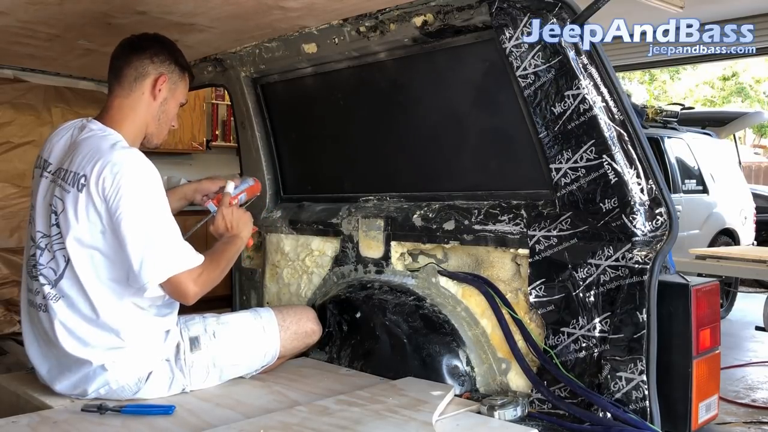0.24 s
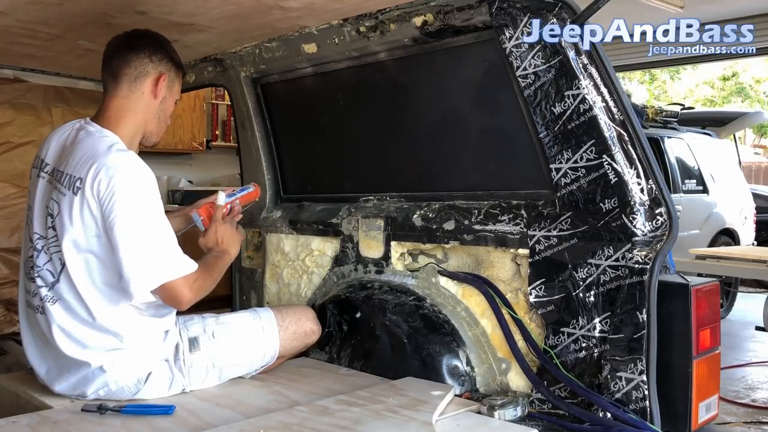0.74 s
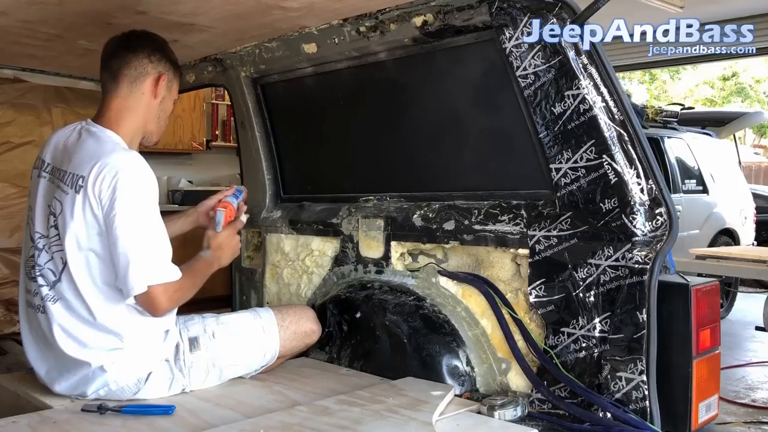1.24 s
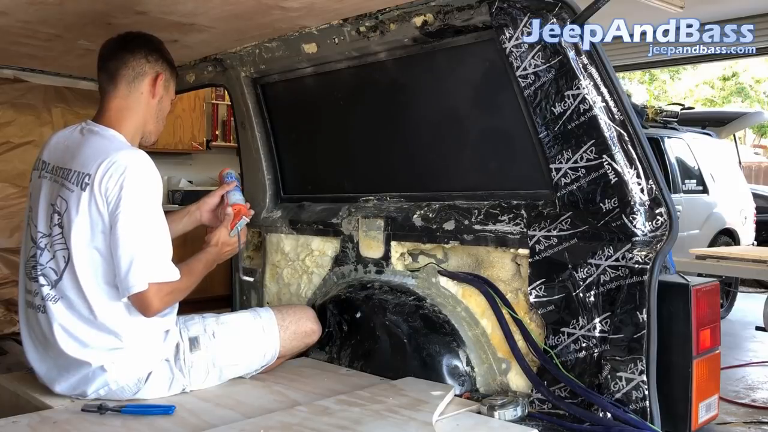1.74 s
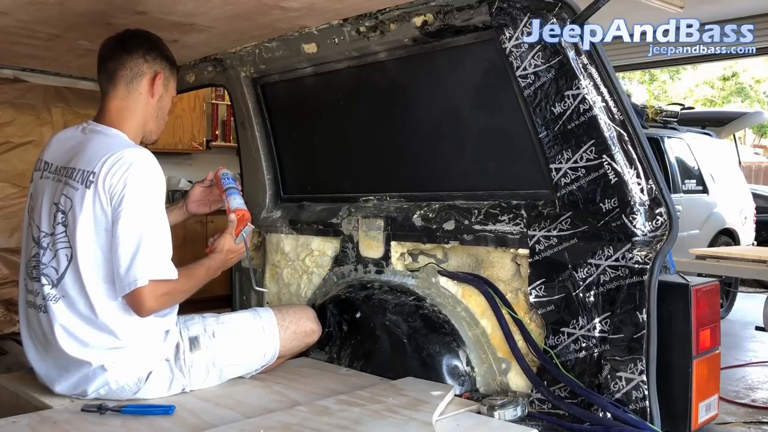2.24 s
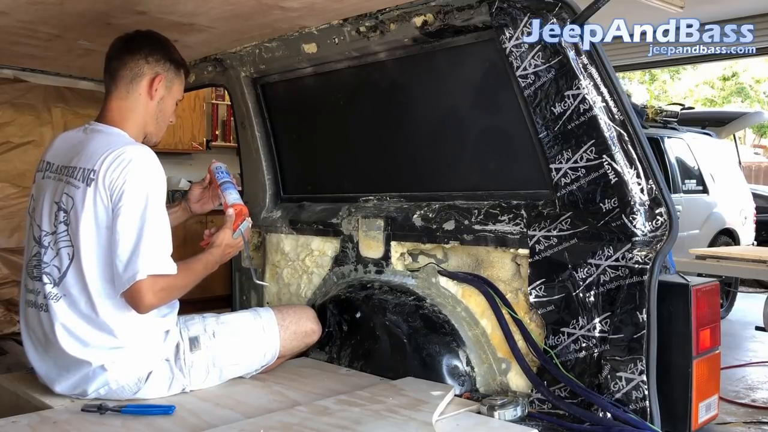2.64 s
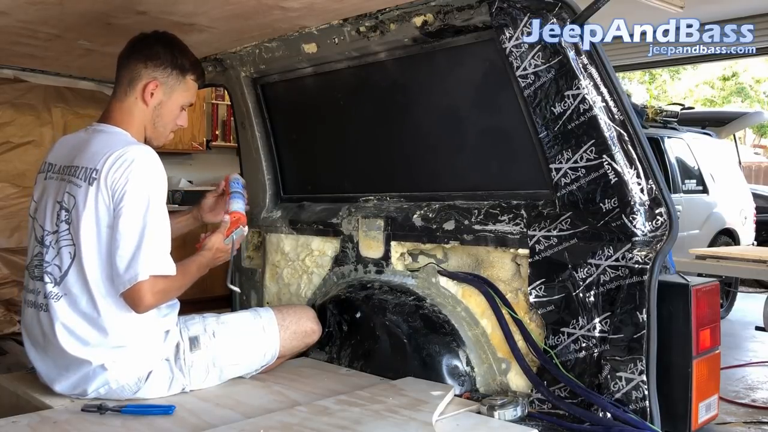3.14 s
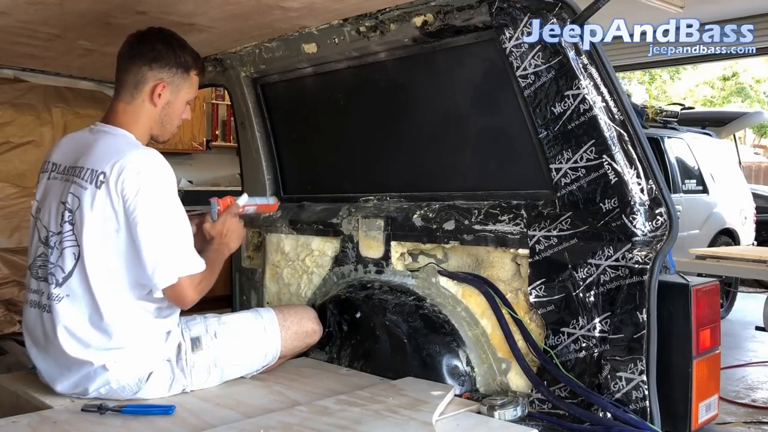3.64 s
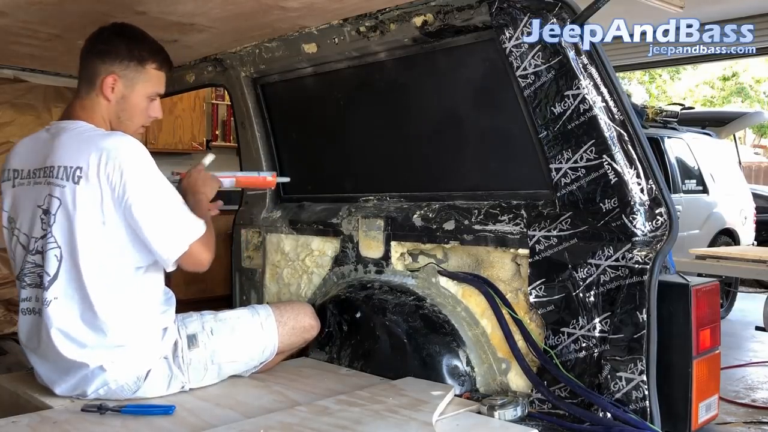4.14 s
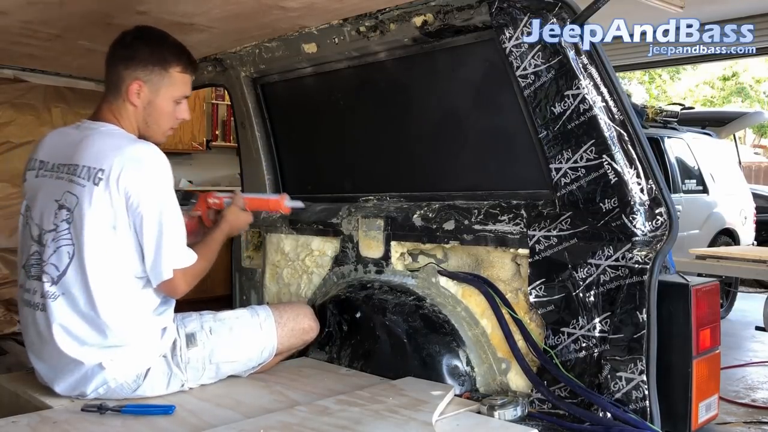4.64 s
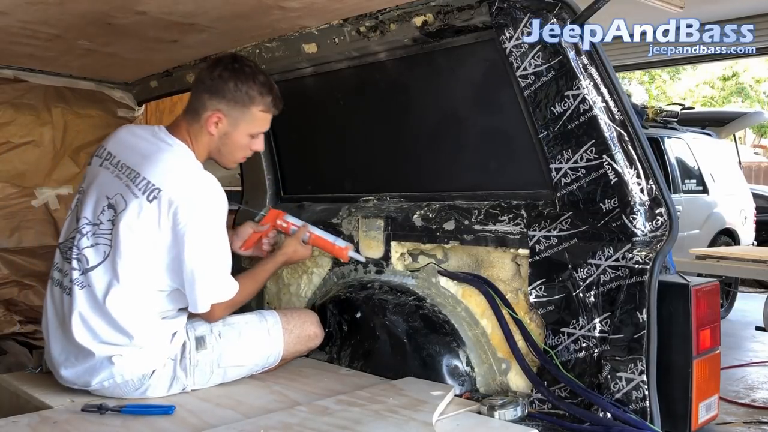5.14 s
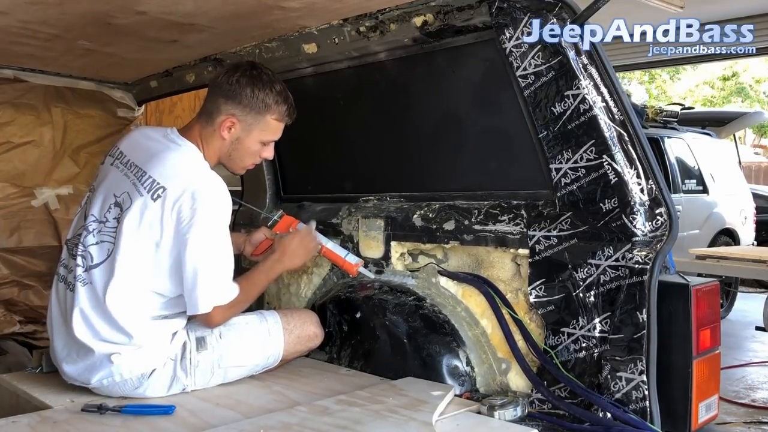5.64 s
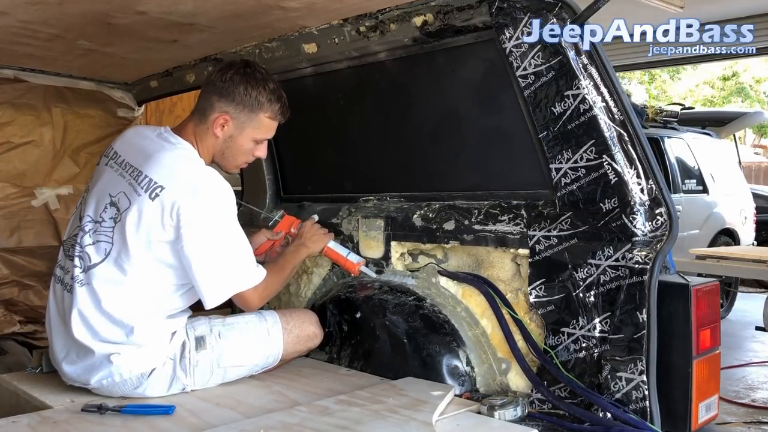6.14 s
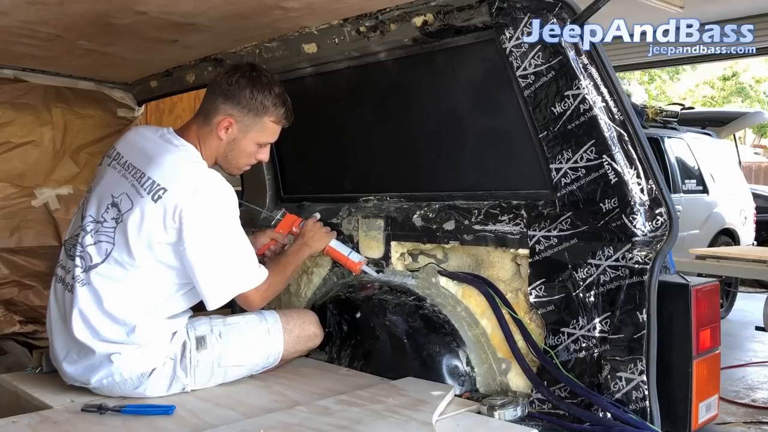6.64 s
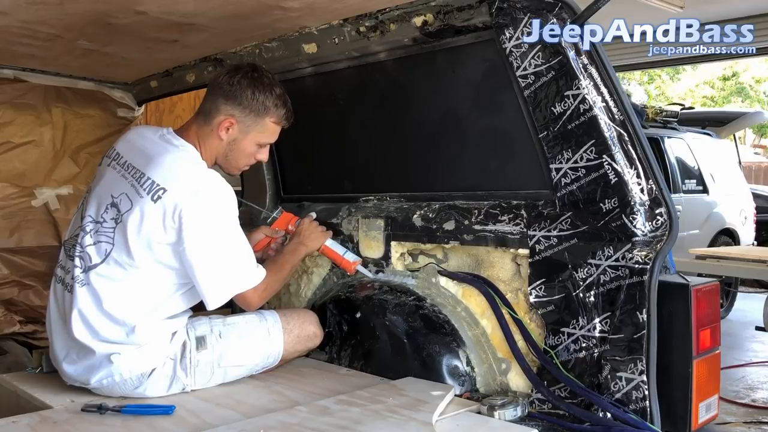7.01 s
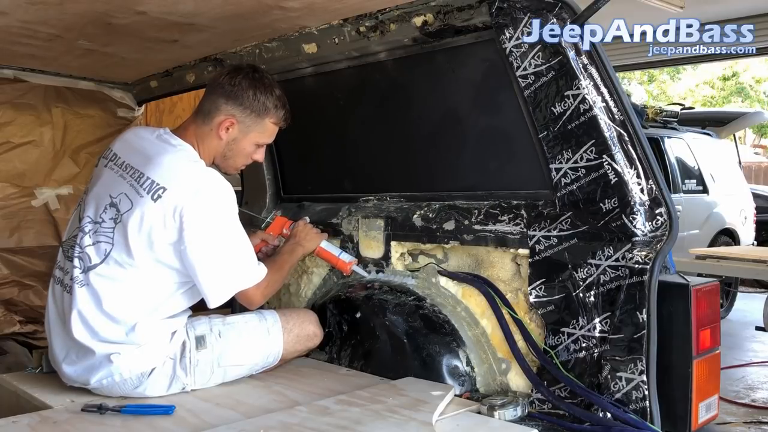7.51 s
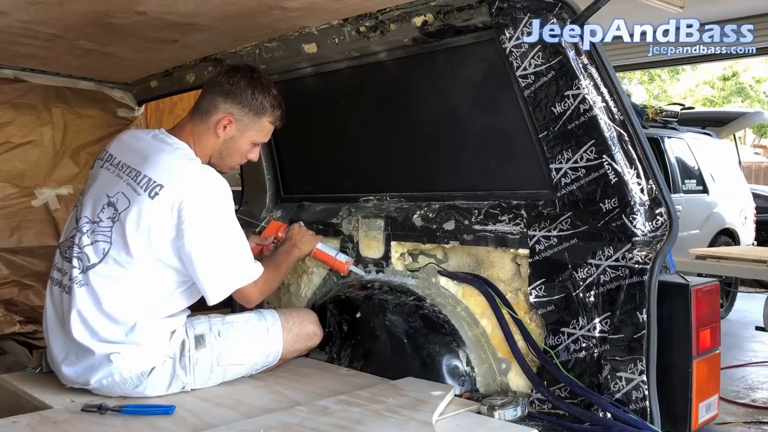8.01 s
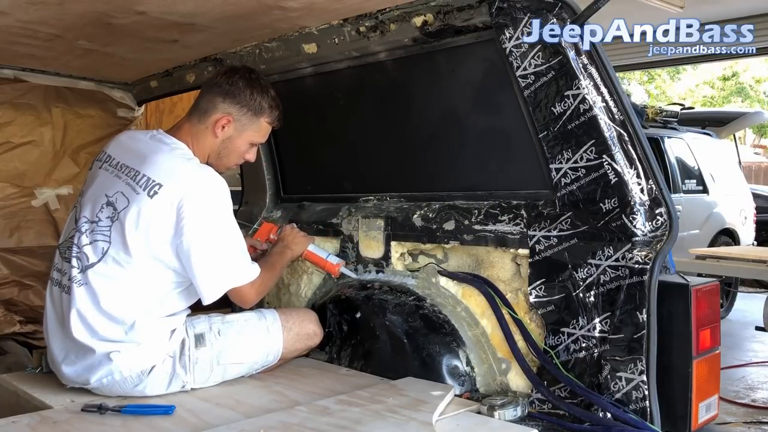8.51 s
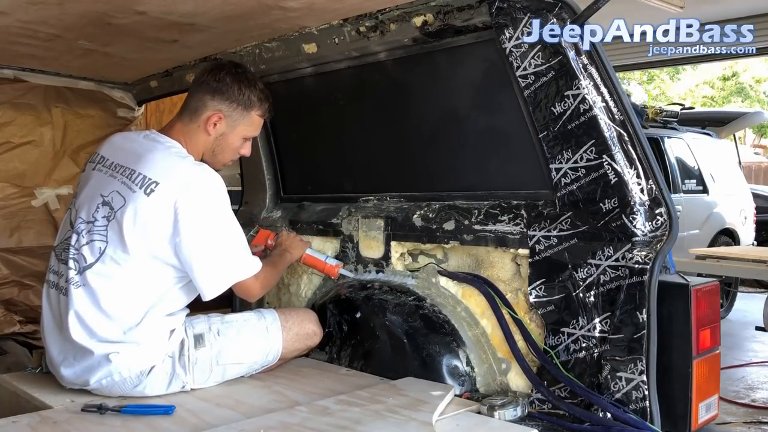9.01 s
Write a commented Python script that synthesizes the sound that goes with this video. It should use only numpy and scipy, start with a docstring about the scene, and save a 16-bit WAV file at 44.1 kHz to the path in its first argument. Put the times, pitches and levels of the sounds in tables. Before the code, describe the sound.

A caulking gun clacks loudly, its steel rod squeaks and scrapes sharply, then small ratcheting ticks continue over a low throbbing motor hum.

```python
"""A hand caulking gun is worked inside the stripped back of a parked vehicle, a metre or two from the microphone.
Its steel rod squeaks (wavering tones) and scrapes (filtered random contacts) through the catch plate, the trigger
clacks against the frame (a noise snap over damped modes), and the loaded rod ticks forward while sealant is laid.
A motor hums in beating sine lines under a faint high hiss and two thin whines; the cabin adds a short echo."""
import sys
import numpy as np
from scipy import signal
from scipy.fft import rfft, irfft, next_fast_len
from scipy.io import wavfile
from scipy.ndimage import uniform_filter1d, minimum_filter1d

SR = 44100
rng = np.random.default_rng(int(sys.argv[2]) if len(sys.argv) > 2 else 0)


def persist_wave(psi):
    """Save psi, clipped to +-1, as 16-bit WAV."""
    counts = np.round(np.clip(psi, -1, 1) * 32767).astype(np.int16)
    wavfile.write(sys.argv[1], SR, np.atleast_2d(counts).T)


N = 408807

# The rod squeals in the plate. Each row: start in seconds, length in seconds, pitch in Hz, level in dB,
# overtones in dB against the fundamental, roughness from 0 to 1.
SQUEALS = [(1.004, .015, 3380, -13.5, -5, .5), (1.018, 0.023, 3380, -12.5, -22, 0.8),
           (1.037, .022, 3030, -20.5, -12, 0), (1.286, 0.0077, 3120, -2.5, -15.5, 0.06),
           (1.295, .0055, 3280, -2.5, -27, 0.3), (1.302, .007, 3360, -7, -23, 0.7),
           (1.3056, .0125, 3154, 0, -14, 0.33), (1.573, .013, 3315, -8, -7, 0.76),
           (1.8012, .0125, 2900, -6.5, -3, 0.1), (1.839, 0.011, 8340, -23, -40, 0.06),
           (4.865, .014, 3140, -18, -18, 0.05)]
# Modes of the gun's frame. Each row: frequency in Hz, level in dB, t60 in seconds.
FRAME_MODES = [(1150, -14.5, 0.071), (1613, -13.5, 0.11), (1827, -6, 0.047), (2052, -2, 0.045),
               (2326, -2, 0.031), (2560, -9, 0.044), (3180, -6, 0.061), (3750, -10, 0.028),
               (4500, -6, 0.068)]
# Spectrum of steel on steel. Each row: frequency in Hz, level in dB.
STEEL_SPECTRUM = [(300, -36), (750, -25), (1150, -7.5), (1700, 1), (4200, 2), (6000, -1), (9000, -2),
                  (12000, -5.5), (15500, -29)]
SLIDE_TILT_DB = -2  # brightness of bare steel sliding, dB per octave


def undb(db):
    """Decibels to gain."""
    return 10 ** (np.asarray(db) / 20)


def unit(x):
    """Scale to rms 1."""
    return x / np.sqrt(np.mean(x ** 2) + 1e-18)


def clock(length):
    """Sample times of a sound of this length in seconds."""
    return np.arange(int(length * SR)) / SR


def onset(t, rise_s):
    """Exponential approach to full force with this time constant."""
    return 1 - np.exp(-t / rise_s)


def fade(t, t60):
    """Exponential decay, 60 dB down after t60 seconds."""
    return np.exp(-np.log(1000) * t / t60)


def add(track, s, x):
    """Mix x into the track at s seconds."""
    i = int(s * SR)
    track[i:i + len(x)] += x[:N - i]


def curve(points, s):
    """Value of a (seconds, value) curve at these times."""
    return np.interp(s, *np.transpose(points))


def colour(x, points, tilt_db=0):
    """Minimum-phase filter through (Hz, dB) points, tilted by dB per octave about the middle of the gun's range."""
    size = 2 * next_fast_len(len(x) // 2 + 1024)
    octave = np.log2(np.maximum(np.fft.rfftfreq(size, 1 / SR), 1))
    hz, db = np.transpose(points)
    db = np.interp(octave, np.log2(hz), db)
    db = db + tilt_db * np.clip(octave - np.log2(3000), -2, 2)
    # folding the cepstrum onto positive times makes the filter causal
    cepstrum = irfft(np.log(undb(db)))
    cepstrum[1:size // 2] *= 2
    cepstrum[size // 2 + 1:] = 0
    response = np.exp(rfft(cepstrum))
    return irfft(rfft(x, size) * response)[:len(x)]


def ring(t, modes, stretch=1, scatter_db=2):
    """Damped modes; each blow weights them a little differently and stretch scales their pitch."""
    out = np.zeros(len(t))
    for hz, db, t60 in modes:
        weight = rng.choice([-1, 1]) * undb(db + scatter_db * rng.standard_normal())
        out += weight * fade(t, t60) * np.sin(2 * np.pi * hz * stretch * t)
    return out


def chatter(t):
    """Dense tiny contacts of equal size and random sign."""
    return rng.choice([-1., 1.], len(t))


def catches(t, depth_db, rate=500):
    """Uneven grip: a level in dB that wanders between random values, rate of them a second, rms 1."""
    knots = np.arange(0, t[-1] + 2 / rate, 1 / rate)
    return unit(undb(depth_db * np.interp(t, knots, rng.standard_normal(len(knots)))))


def damped_tones(rows):
    """Soft pushes that each set a single damped resonance going."""
    out, t = np.zeros(N), clock(.2)
    for s, db, hz, rise_s, t60 in rows:
        add(out, s, undb(db) * onset(t, rise_s) * fade(t, t60) * np.sin(2 * np.pi * hz * t))
    return out


def hum(drift_rad=0.19, looseness=0.47):
    """Close motor lines that throb together once a turn, loosely in step, and wander slightly in phase."""
    mains_hz, turn_hz = 60, 18.34
    # Rms in dB of lines one turning rate apart, the second at twice the mains.
    beat_levels = [-45.5, -44.5, -36, -52, -52.5]
    # Multiples of the turning rate, and the rms of each in dB.
    shaft_orders = (2, 4, 5, 10)
    shaft_levels = [-62, -53.5, -58, -53]
    # Other tones. Each row: frequency in Hz, rms in dB.
    other_tones = [(58.9, -54.5), (528, -61.5)]
    beats = [(2 * mains_hz + (k - 1) * turn_hz, db) for k, db in enumerate(beat_levels)]
    shaft = [(k * turn_hz, db) for k, db in zip(shaft_orders, shaft_levels)]
    t, out = np.arange(N) / SR, np.zeros(N)
    knots = np.arange(0, t[-1] + 1, .5)
    for hz, db in beats + shaft + list(other_tones):
        wander = drift_rad * np.interp(t, knots, rng.standard_normal(len(knots)))
        turns = hz * t + looseness * rng.random()
        out += np.sqrt(2) * undb(db) * np.sin(2 * np.pi * turns + wander)
    return out


def background():
    """A motor's beating hum over steady air noise and two thin whines, which are narrow bands of noise."""
    # Each row: centre in Hz, half-width in Hz where the level is 6 dB down, rms in dB.
    whine_bands = [(2060, 77, -54.5), (8880, 55, -51.5)]
    # Spectrum of the air noise. Each row: frequency in Hz, level in dB.
    air_spectrum = [(25, -26), (45, -12), (62, -0.5), (130, 1.5), (200, 0.5), (350, -3.5), (470, -9.5),
                    (1500, -13.5), (3200, -19), (6300, -16.5), (7400, -11), (8700, -6), (11500, -13),
                    (16000, -18)]
    air_db = -37
    f = np.fft.rfftfreq(N, 1 / SR)
    whine = np.zeros(N)
    for hz, width, db in whine_bands:
        band = rfft(rng.standard_normal(N)) / (1 + ((f - hz) / width) ** 2)
        whine += undb(db) * unit(irfft(band, N))
    mid, side = (undb(air_db) * unit(colour(rng.standard_normal(N), air_spectrum)) for _ in range(2))
    # the two microphone ports hear nearly the same bass and differ more in the treble
    side = colour(side, [(40, -20), (130, -32), (220, -18.5), (500, -13.0),
                         (1500, -16.5), (4000, -16.5), (8700, -18.5), (14000, -8.5)])
    return hum() + whine + mid + side * np.array([[1], [-1]])


def handling(grain_db=4, fits_db=4, fits_per_s=40):
    """The loose rod rubs in its guide and the gun in the hands, in small fits as they are moved."""
    # The rod rubs in its guide between pulls. Each row: time in seconds, level in dB.
    sliding_levels = [(.93, -64), (1.0, -35), (1.15, -41), (1.4, -37.5), (1.9, -40), (2.05, -49),
                      (2.2, -49), (2.4, -70)]
    # Faint rubbing while the gun is turned in the hands. Each row: time in seconds, level in dB.
    grip_levels = [(3.2, -66), (3.8, -53), (4.1, -58), (4.6, -50.5), (5.12, -42), (5.3, -64), (6, -52),
                   (6.2, -64), (8.55, -50), (9.2, -59)]
    grip_tilt_db = -6.5  # brightness per octave
    t, out = np.arange(N) / SR, np.zeros(N)
    for levels, tilt_db in (sliding_levels, SLIDE_TILT_DB), (grip_levels, grip_tilt_db):
        slips = chatter(t) * catches(t, grain_db) * catches(t, fits_db, fits_per_s)
        out += undb(curve(levels, t)) * unit(colour(slips, STEEL_SPECTRUM, tilt_db))
    return out


def scrapes(grain_db=3, uneven_db=4, frame_db=-38, overrun=1.65):
    """Sliding metal, alone and under each squeal: a swell of uneven micro-slips that also stirs the frame."""
    # Rod and tube rub in the frame. Each row: start in seconds, length in seconds, level in dB,
    # brightness in dB per octave.
    rubs = [(0.0706, .008, -23.5, -5.5), (0.309, .028, -25.5, -8.5), (.35, 0.043, -30.5, -5),
            (1.253, 0.09, -29, -2), (1.305, 0.021, -23, 8), (1.452, 0.046, -25, -2),
            (1.526, 0.023, -26, -1.5), (1.547, 0.034, -24, -2.5), (1.7, 0.062, -25, -1.5),
            (1.793, 0.041, -21, -1), (3.614, 0.072, -42.5, -6), (4.812, 0.039, -34, -7.5),
            (5.023, .066, -29, -5), (5.048, .018, -33, 4.5), (6.85, 0.037, -30.5, -2),
            (7.916, .021, -31.5, -1), (9.115, 0.056, -28.5, 0)]
    full_squeal_db, follow = -24.5, 0.58  # scrape under a 0 dB squeal; dB of scrape per dB of squeal
    under_squeals = [(s, overrun * length, full_squeal_db + follow * db, SLIDE_TILT_DB)
                     for s, length, _, db, _, _ in SQUEALS]
    out = np.zeros(N)
    for s, length, db, tilt_db in list(rubs) + under_squeals:
        t = clock(length)
        grains = undb(grain_db * np.minimum(rng.exponential(size=len(t)), 5))
        slips = chatter(t) * grains * catches(t, uneven_db)
        swell = signal.windows.tukey(len(t), .5)
        add(out, s, undb(db) * unit(colour(slips * swell, STEEL_SPECTRUM, tilt_db)))
    stirred_frame = signal.fftconvolve(out, ring(clock(.2), FRAME_MODES))[:N]
    return out + undb(frame_db) * stirred_frame


def clacks(gain_db=-6, snap_t60=0.015, rattle_db=-4, hollow_db=2, ring_db=-11, uneven_db=3, detune=0.0245):
    """A snap and a brief uneven rattle of steel; the frame rings and the tube answers with a hollow knock."""
    # Trigger and catch hit the frame. Each row: start in seconds, level in dB before the common gain,
    # brightness in dB per octave, contact rise in seconds.
    hits = [(.078, 5.5, -3.5, 0.0017), (.316, -6.5, -2, .0034), (.347, -5.5, -5.5, .0008),
            (.363, -7.5, -4, .001), (.383, -5, -3.5, 0.0017), (.981, -5, -4.5, 0.0024),
            (1.179, -5.5, -1.5, .0035), (1.195, -1.5, -1.5, 0.00056), (1.468, -9, 4, .001),
            (1.478, 4, 1.5, 0.00058), (1.589, -4, -2.5, 0.0011), (1.777, -8.5, -5.5, .0006),
            (1.8158, -1.5, -4.5, .001), (4.893, -5, -5.5, 0.00035), (6.8776, -3.5, -2, 0.002),
            (7.9377, 0, -1.3, .0003), (7.949, -6, 2, .0015), (9.1068, 1, 0.8, .0007),
            (9.128, -0.5, 0.2, 0.00066)]
    # The tube knocks hollow until it is seated in the frame. Each row: time in seconds,
    # level in dB relative to the clack, before hollow_db.
    tube_play = [(.08, -11), (.32, 4), (.38, -9), (.6, -36)]
    # Spectrum of the hollow knock. Each row: frequency in Hz, level in dB.
    hollow_spectrum = [(100, -6), (300, 0), (600, -3.5), (850, 6), (1150, 12.5), (1600, 0), (4000, -24)]
    rattle_t60 = 0.047  # seconds
    out, t = np.zeros(N), clock(0.22)
    for s, db, tilt_db, rise_s in hits:
        press = onset(t, rise_s)
        snap = fade(t, snap_t60 + 2 * rise_s)
        rattle = undb(rattle_db) * fade(t, rattle_t60) * catches(t, uneven_db)
        contact = chatter(t) * press * (snap + rattle)
        steel = colour(contact, STEEL_SPECTRUM, tilt_db)
        tube = undb(curve(tube_play, s) + hollow_db) * colour(contact, hollow_spectrum)
        stretch = 1 + detune * rng.standard_normal()  # the modes shift with the grip
        frame = undb(ring_db) * press * ring(t, FRAME_MODES, stretch)
        add(out, s, undb(db + gain_db) * (steel + tube + frame))
    return out


def twangs():
    """Parts of the gun twang, each a single damped tone at its own pitch; the higher, the shorter. The two
    highest rows ring out of the frame at the first clacks."""
    # Each row: start in seconds, level in dB, pitch in Hz.
    twang_rows = [(.079, -4, 3720), (.347, -11.5, 3780), (4.583, -35, 1450), (5.03, -23, 1600),
                  (5.068, -13, 2620), (6.03, -30, 1445), (6.876, -21.5, 1338), (7.922, -19, 1630),
                  (7.944, -14, 1590), (9.112, -23, 1116), (9.128, -11.5, 1625), (9.144, -13, 1616)]
    rise_cycles, ring_cycles = 2.9, 117  # rise time constant and t60, in cycles of the pitch
    return damped_tones([(s, db, hz, rise_cycles / hz, ring_cycles / hz) for s, db, hz in twang_rows])


def ticks(low_db=-8.0, high_db=-8.2, grit_db=-8, detune=0.026):
    """Each gritty slip of the rod knocks the gun; hand and full tube damp it, and the grip shifts its pitch a little."""
    # The rod slips a little. Each row: start in seconds, level in dB before the make-up.
    slip_rows = [(0.7627, -24), (0.856, -25.5), (0.9113, -19.5), (0.929, -26), (3.3044, -28), (3.6155, -20),
                 (3.9794, -22.5), (4.1988, -23), (4.5105, -26.5), (4.58, -21.5), (4.6558, -24),
                 (4.788, -25), (4.8245, -20.5), (5.3955, -14), (5.9736, -26), (6.0232, -19),
                 (6.2406, -14.5), (6.4916, -21.5), (6.576, -12.5), (6.783, -20), (6.8199, -20),
                 (7.1865, -13.5), (7.3508, -18.5), (7.5009, -15), (7.632, -17), (7.8386, -11),
                 (8.2186, -25), (8.318, -21.5), (8.4389, -19.5), (8.7296, -19), (8.861, -18),
                 (9.0268, -14.5)]
    # Resonances of the gun under load, lower and upper group. Each row: frequency in Hz, level in dB,
    # t60 in seconds.
    low_modes = [(1457, 0, 0.025), (1708, -2.5, 0.018)]
    high_modes = [(2205, -1.3, 0.02), (2523, -0.69, 0.024)]
    # Spectrum of the grit. Each row: frequency in Hz, level in dB.
    grit_spectrum = [(500, -24), (1100, -12), (2000, 1.5), (3000, 2), (4000, 1.5), (6000, -7), (9000, -9.5),
                     (15000, -21)]
    # Make-up of a slip, slack and loaded: low ring, upper ring and grit in dB, before the trims above.
    slack_mix = (-19, -20, -11.5)
    loaded_mix = (-12.5, -14, -20)
    # pressure builds in the tube between these times; it turns the slips from gritty to ringing
    load_from_s, load_full_s = 4.1, 9
    slack_rise_s, loaded_rise_s = .0025, .0008  # a slack rod scuffs softly, a loaded one lets go at once
    slack_grit_t60, loaded_grit_t60 = .038, .022  # seconds
    out, t = np.zeros(N), clock(.05)
    for s, db in slip_rows:
        load = np.interp(s, [load_from_s, load_full_s], [0, 1])
        low, high, grit = (1 - load) * np.array(slack_mix) + load * np.array(loaded_mix)
        rise_s = slack_rise_s * (loaded_rise_s / slack_rise_s) ** np.sqrt(load)
        press = onset(t, rise_s)
        grit_t60 = (1 - load) * slack_grit_t60 + load * loaded_grit_t60
        stretch = 1 + detune * rng.standard_normal()
        body = undb(low + low_db) * unit(press * ring(t, low_modes, stretch))
        body += undb(high + high_db) * unit(press * ring(t, high_modes, stretch))
        contact = press * chatter(t) * fade(t, grit_t60)
        scratch = undb(grit + grit_db) * unit(colour(contact, grit_spectrum))
        add(out, s, undb(db) * (body + scratch))
    return out


def squeaks(wobble=0.092, third_db=-7, edge=0.36):
    """Stick-slip locks onto the rod's pitch for a few milliseconds, wavers and lets go."""
    sag = 0.039  # share of its pitch that a squeal loses as the rod slows
    out = np.zeros(N)
    for s, length, pitch_hz, db, over_db, rough in SQUEALS:
        t = clock(length)
        waver = unit(uniform_filter1d(rng.standard_normal(len(t)), size=24))
        waver = waver - waver.mean()
        hz = pitch_hz * (1 + sag * (.5 - t / length)) * (1 + wobble * rough * waver)
        phase = 2 * np.pi * np.cumsum(hz) / SR
        overtones = np.sin(2 * phase) + undb(third_db) * np.sin(3 * phase)
        tone = np.sin(phase) + undb(over_db) * overtones
        add(out, s, undb(db) * tone * signal.windows.tukey(len(t), edge))
    return out


def rod(strike_s=0.0024, buzz_db=5.5, pump=1.1):
    """The free length of the rod rings on after each squeal: beating modes that buzz loosely in its guide."""
    # Modes of the bare rod. Each row: frequency in Hz, level in dB, t60 in seconds.
    rod_modes = [(3104, -19, 0.22), (3140, -5, .15), (3280, -4, 0.37), (3350, -4, 0.73), (3400, -4, .25),
                 (3455, 3, 0.43)]
    # The ring drops and is choked as the plunger settles against the tube. Each row: time in seconds,
    # lowest mode in Hz, ring level in dB.
    seating = [(1.6, 3090, -1), (1.8, 2935, -0.5), (4.8, 2935, -4)]
    # ring level at a 0 dB squeal of length fill_s; dB of ring per dB of squeal
    ring_db, fill_s, follow = -27, 0.015, 0.41
    out, t = np.zeros(N), clock(.5)
    times, lowest_hz, choke_db = np.transpose(seating)
    for s, length, _, db, _, _ in SQUEALS:
        stretch = np.interp(s, times, lowest_hz) / rod_modes[0][0]
        modes = ring(t, rod_modes, stretch, scatter_db=3) * catches(t, buzz_db)
        level_db = ring_db + follow * db + np.interp(s, times, choke_db)
        size = undb(level_db) * (length / fill_s) ** pump  # a longer squeal pumps it more
        add(out, s + length / 2, size * onset(t, strike_s) * modes)
    return out


def panel(rise_s=.0009):
    """The side panel booms when it is touched; a harder touch reaches its upper modes."""
    # Soft bumps. Each row: start in seconds, level in dB, hardness in dB per octave above the first mode.
    touches = [(5.522, -24, -7), (5.533, -18, -9), (5.552, -22.5, 1)]
    # Modes of the panel. Each row: frequency in Hz, level in dB, t60 in seconds.
    panel_modes = [(190, 1, 0.056), (280, -1, .05), (850, -5, 0.03), (1136, -7, 0.088), (1440, 3.5, 0.024)]
    rows = []
    for s, db, hard_db in touches:
        for hz, mode_db, t60 in panel_modes:
            level_db = db + mode_db + hard_db * np.log2(hz / panel_modes[0][0])
            rows.append((s, level_db, hz, rise_s, t60))
    return damped_tones(rows)


def plops(rise_s=0.0022, t60=0.032):
    """Small air pockets leave the nozzle with the sealant: faint, dull damped tones."""
    # Each row: start in seconds, level in dB, pitch in Hz.
    pockets = [(7.024, -29.5, 850), (8.347, -26, 805)]
    return damped_tones([(s, db, hz, rise_s, t60) for s, db, hz in pockets])


def cabin(x, early_db=-6, early_t60=0.14, late_db=-19, late_t60=0.62, first_s=0.00249,
          early_side_db=-6, late_side_db=-3):
    """Close panels scatter the sound at once; a duller, wider tail hangs in the garage around them."""
    t = clock(.7)

    def echoes(early_gain, late_gain):
        """Convolve with decaying random reflections, an early and a late set."""
        early = chatter(t) * fade(t, early_t60) * (t > first_s)
        late = colour(chatter(t), [(200, 0.0), (2500, -1.0), (6000, -6.5), (14000, -20)])
        late = late * fade(t, late_t60) * (1 - fade(t, 0.13))  # the tail swells before it dies
        reflections = early_gain * unit(early) + late_gain * unit(late)
        return signal.fftconvolve(x, reflections)[:N] / np.sqrt(len(t))

    mid = echoes(undb(early_db), undb(late_db))
    side = echoes(undb(early_db + early_side_db), undb(late_db + late_side_db))
    side = colour(side, [(700, -3.0), (2000, -11.5), (4500, -5.0), (12000, 2.5)])
    return x + mid + side * np.array([[1], [-1]])


def scene():
    """The gun in the cabin over the background, all slightly stronger on the right."""
    # squeaks and twangs are heard drier, with less echo than the rest
    tones = cabin(squeaks() + twangs(), early_db=-7.5, late_db=-25.5)
    gun = cabin(clacks() + ticks() + scrapes() + handling() + panel() + plops() + rod())
    balance_db = -0.1  # left relative to right
    return (tones + gun + background()) * undb(np.array([[balance_db], [-balance_db]]) / 2)


def record(dry):
    """A fast limiter turns down the loudest peaks to just under full scale; a steep low-pass then cuts the top."""
    top_hz = 15900
    gain = 1 / np.maximum(np.abs(dry).max(axis=0) / .97, 1)
    # hold each dip for about 2 ms, then smooth it
    gain = uniform_filter1d(minimum_filter1d(gain, size=89), size=89)
    low_pass = signal.ellip(10, .2, 70, top_hz, fs=SR, output="sos")
    return signal.sosfilt(low_pass, dry * gain)


dry = scene()
out = record(dry)
persist_wave(out)
```